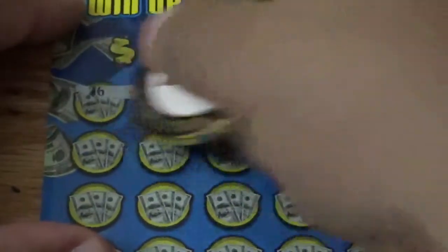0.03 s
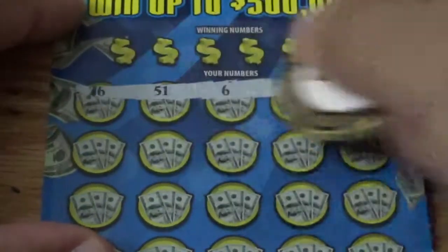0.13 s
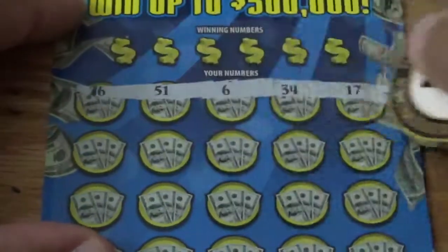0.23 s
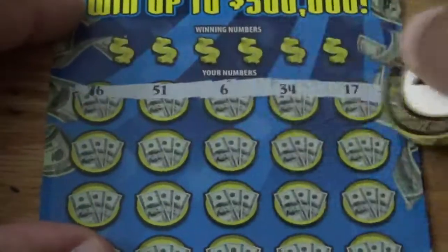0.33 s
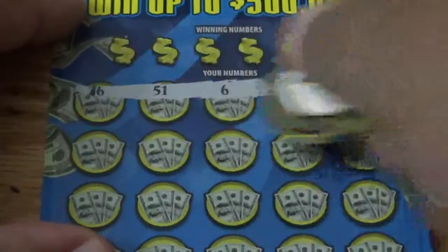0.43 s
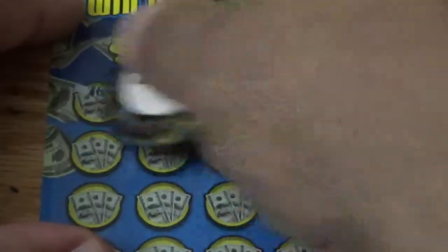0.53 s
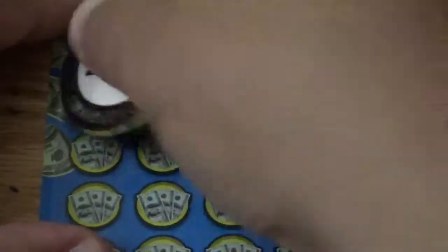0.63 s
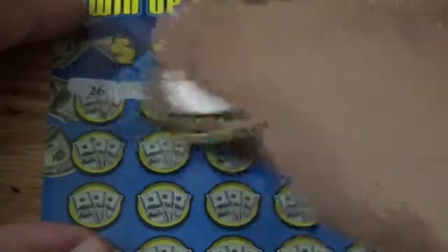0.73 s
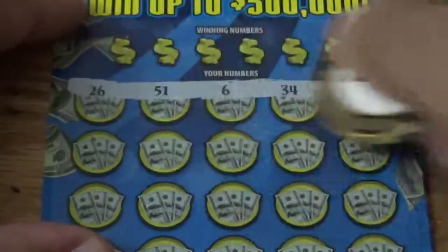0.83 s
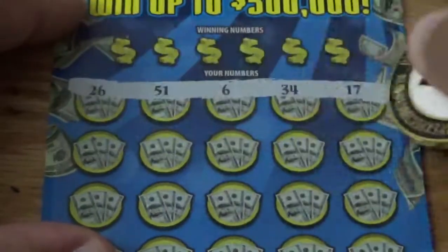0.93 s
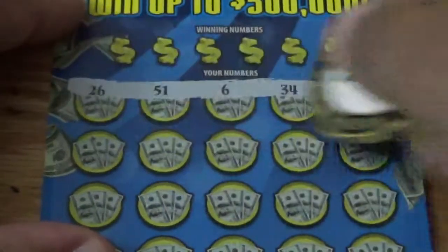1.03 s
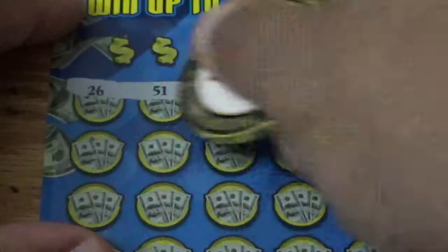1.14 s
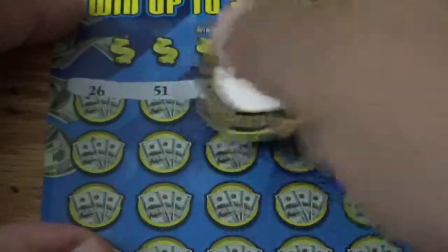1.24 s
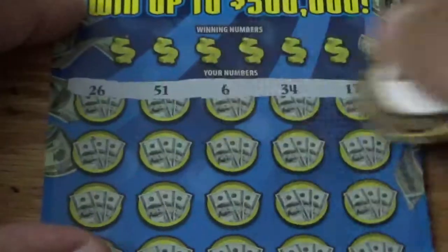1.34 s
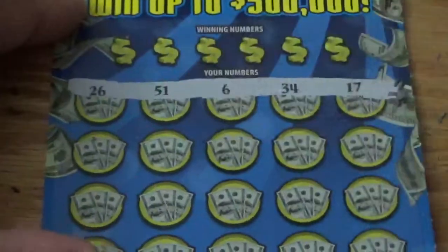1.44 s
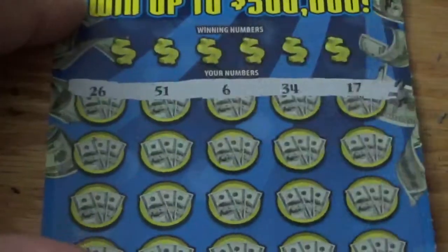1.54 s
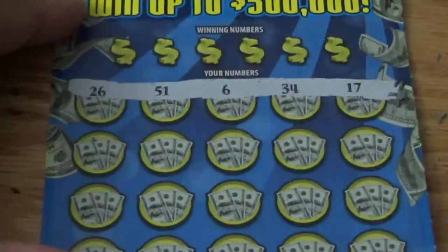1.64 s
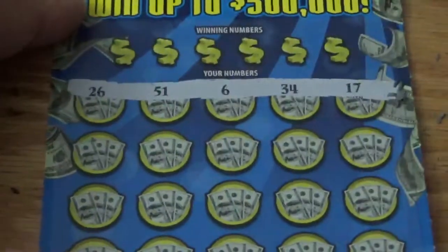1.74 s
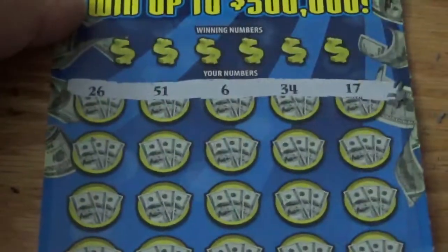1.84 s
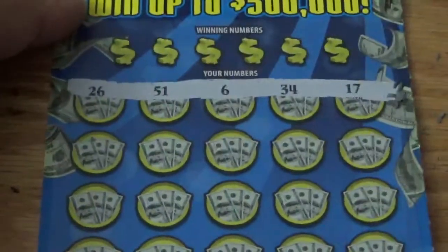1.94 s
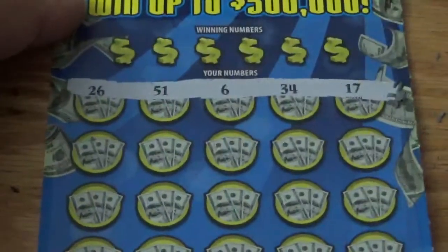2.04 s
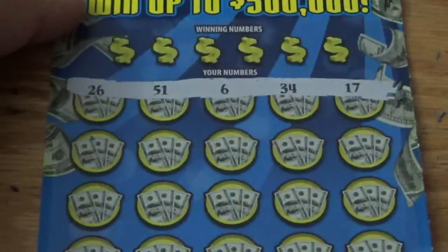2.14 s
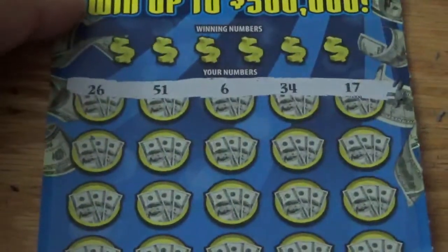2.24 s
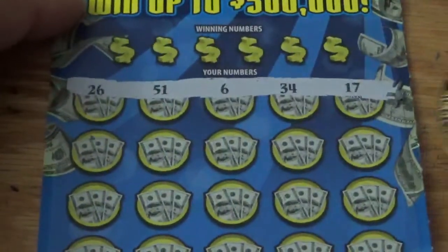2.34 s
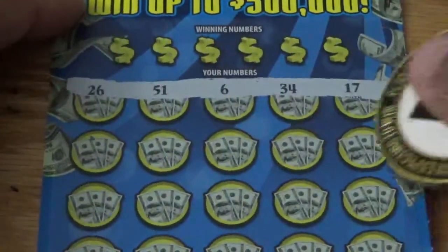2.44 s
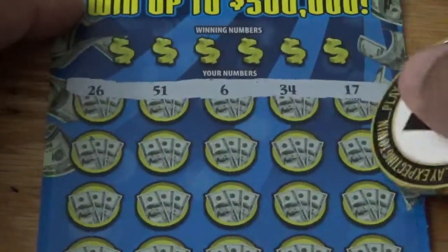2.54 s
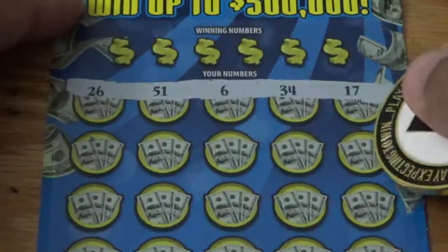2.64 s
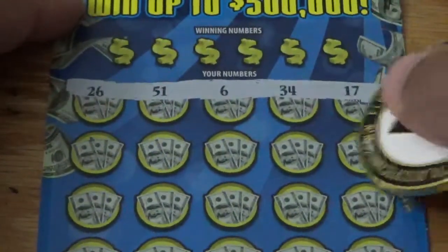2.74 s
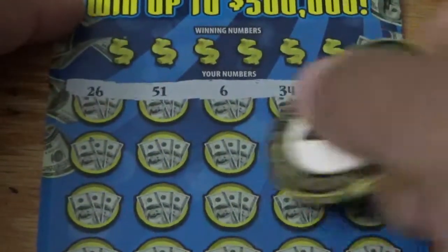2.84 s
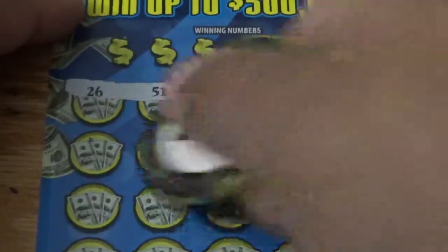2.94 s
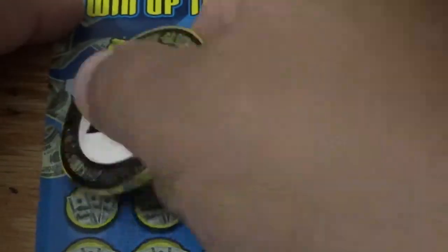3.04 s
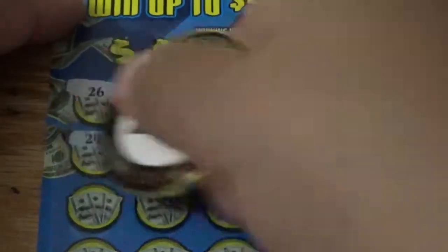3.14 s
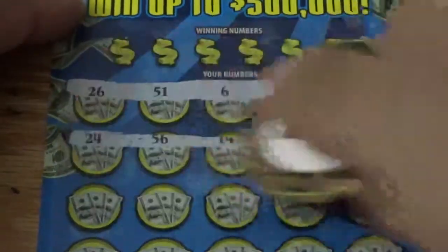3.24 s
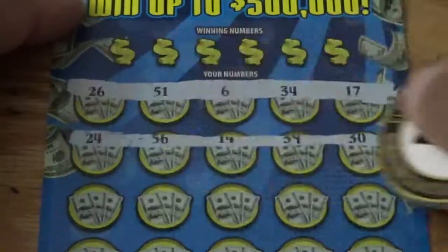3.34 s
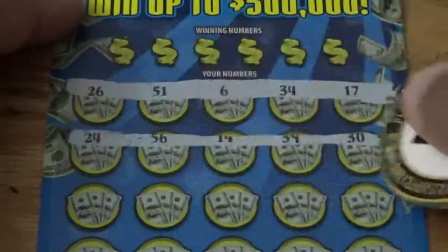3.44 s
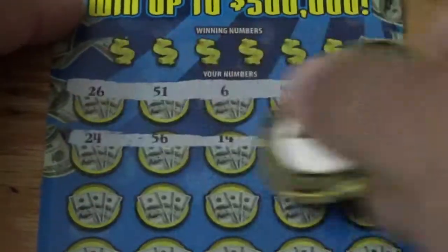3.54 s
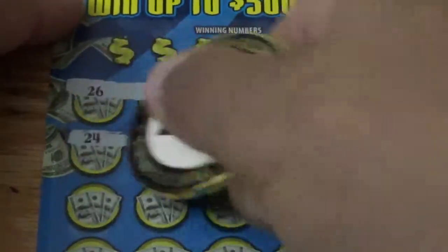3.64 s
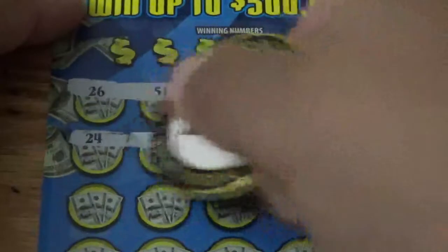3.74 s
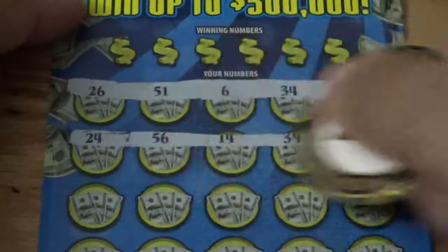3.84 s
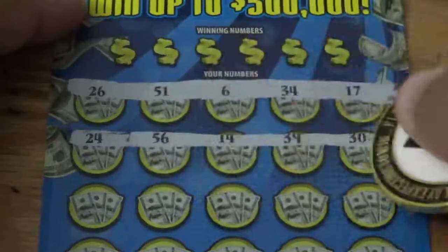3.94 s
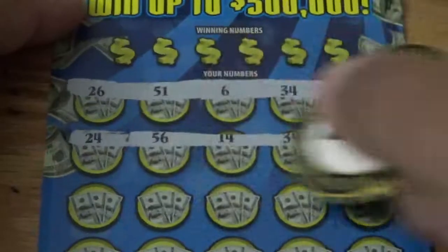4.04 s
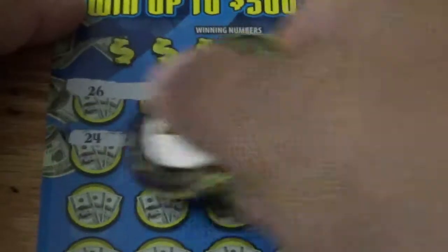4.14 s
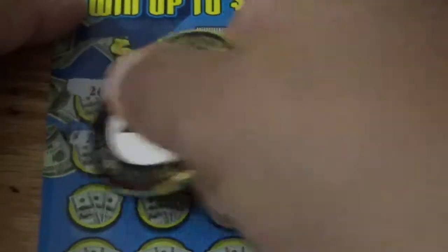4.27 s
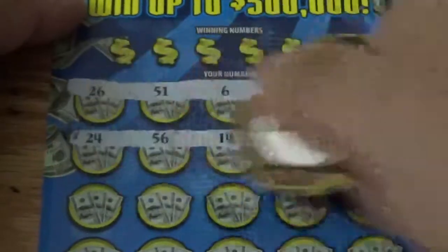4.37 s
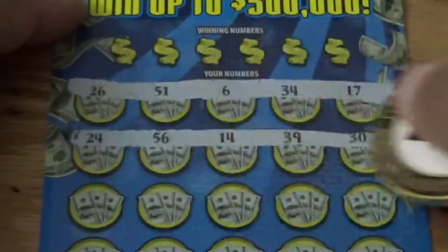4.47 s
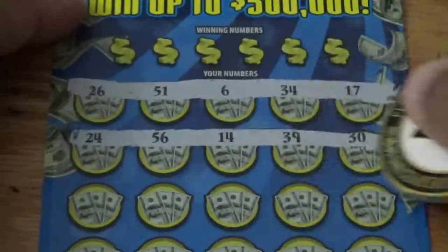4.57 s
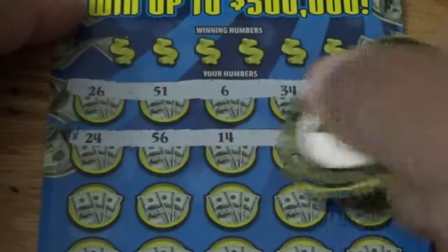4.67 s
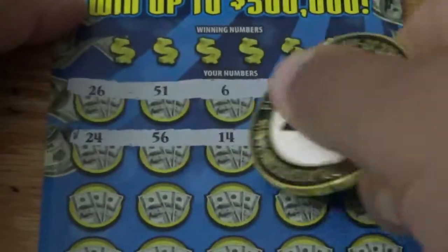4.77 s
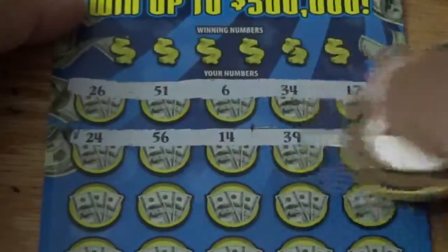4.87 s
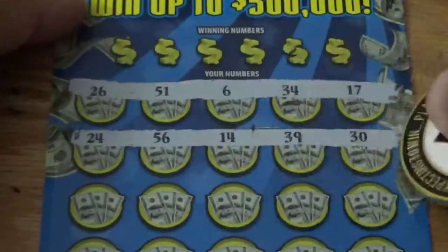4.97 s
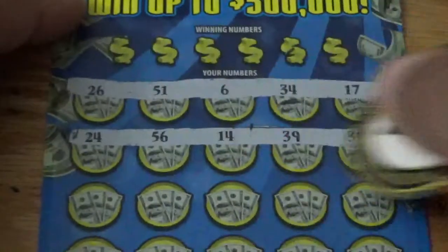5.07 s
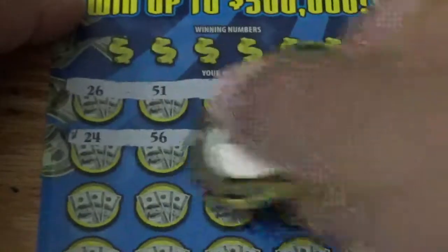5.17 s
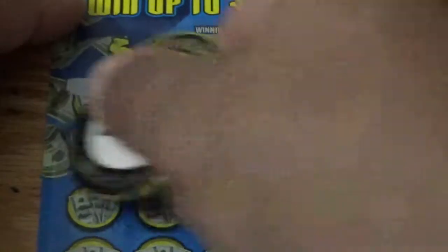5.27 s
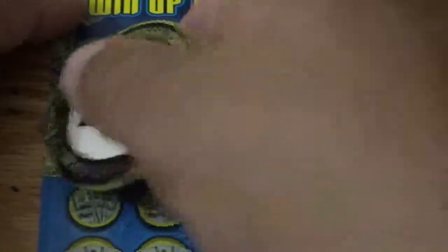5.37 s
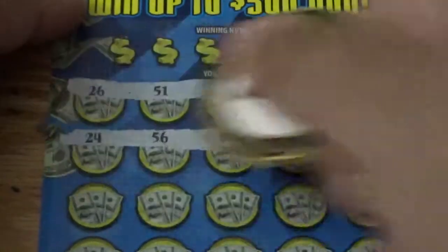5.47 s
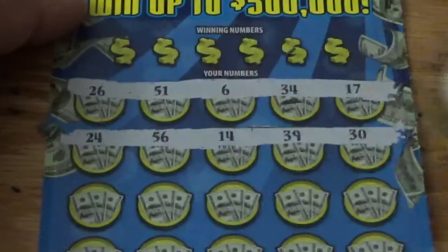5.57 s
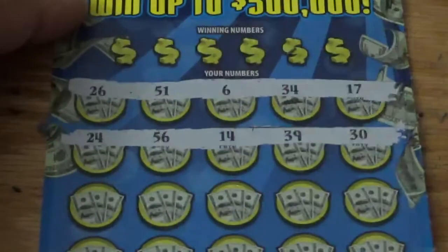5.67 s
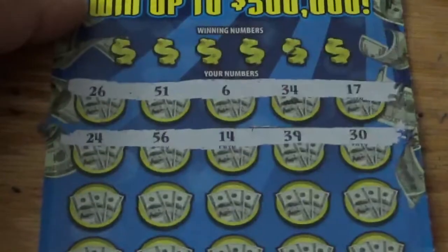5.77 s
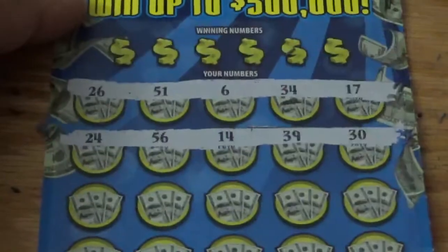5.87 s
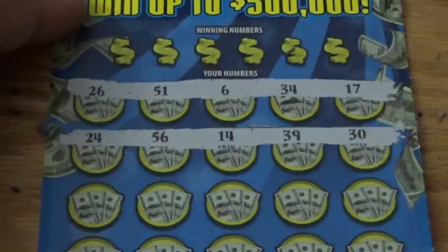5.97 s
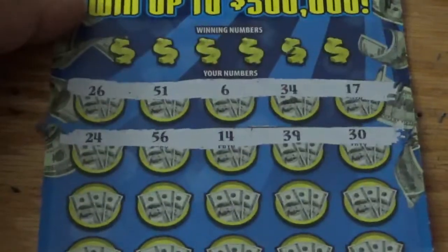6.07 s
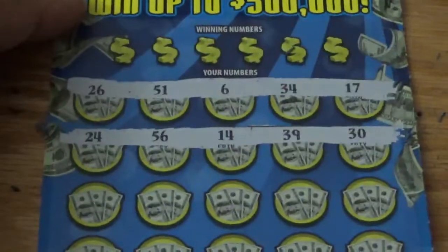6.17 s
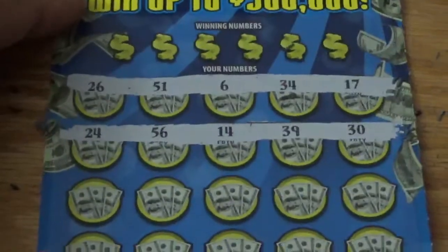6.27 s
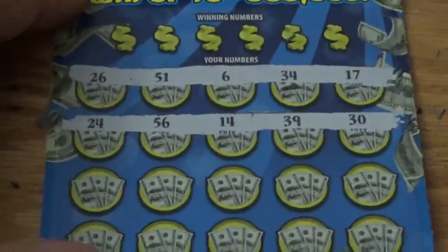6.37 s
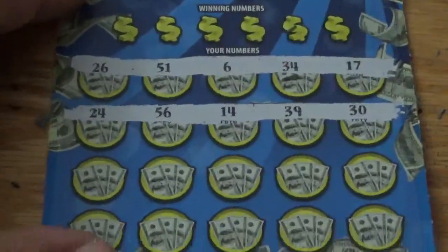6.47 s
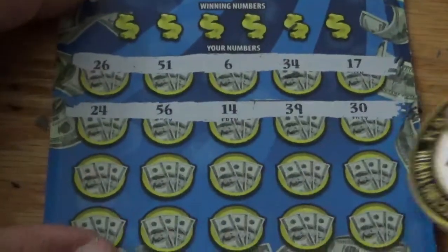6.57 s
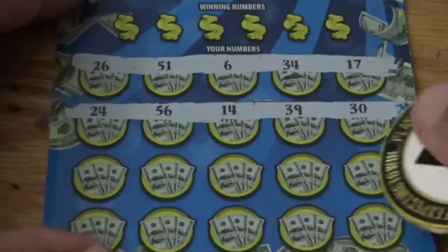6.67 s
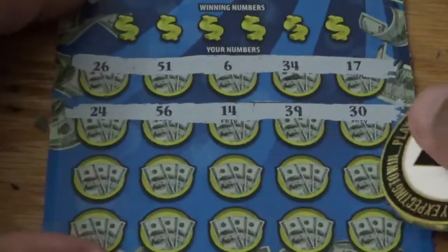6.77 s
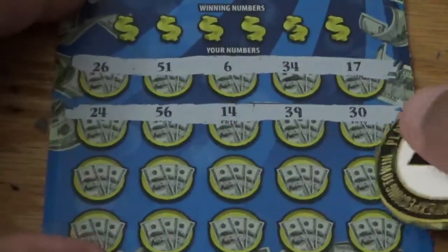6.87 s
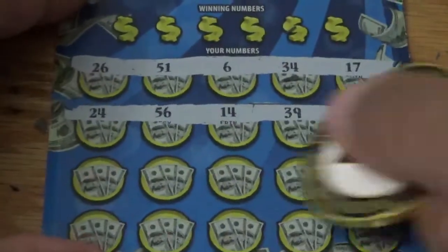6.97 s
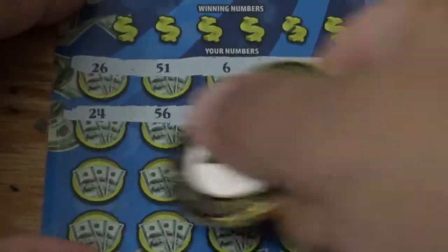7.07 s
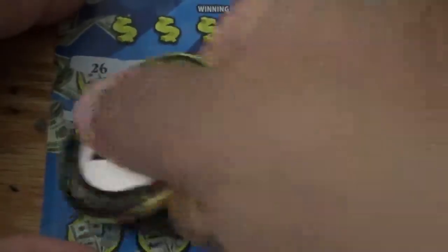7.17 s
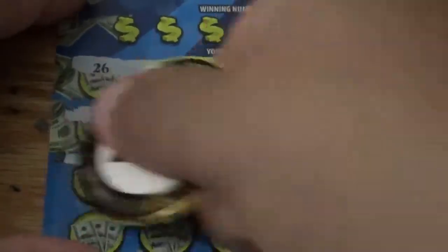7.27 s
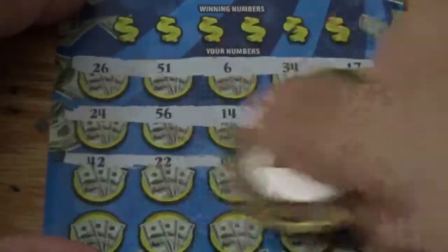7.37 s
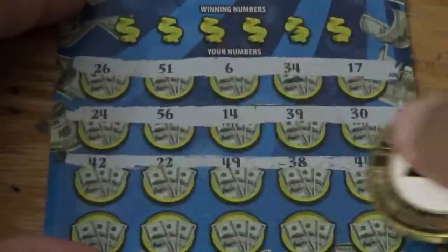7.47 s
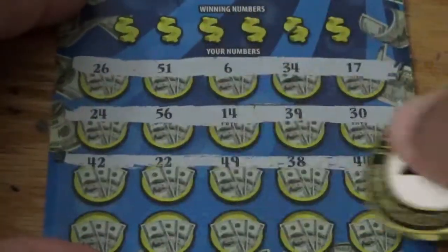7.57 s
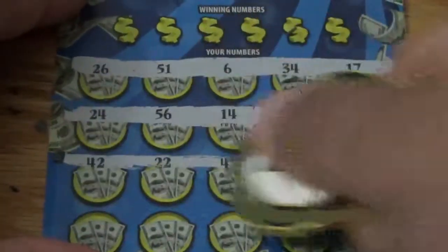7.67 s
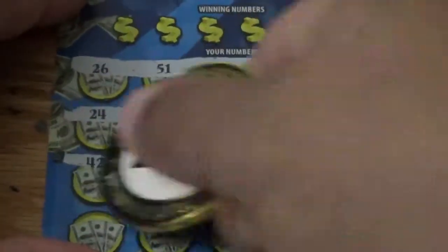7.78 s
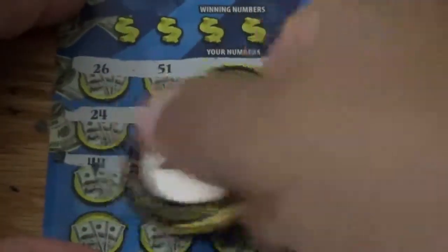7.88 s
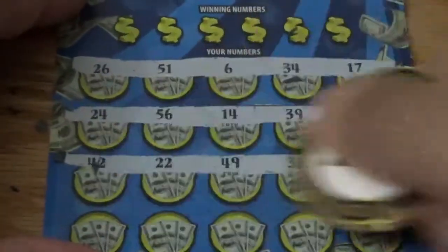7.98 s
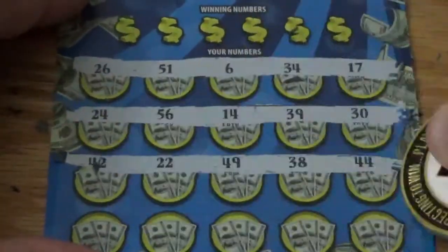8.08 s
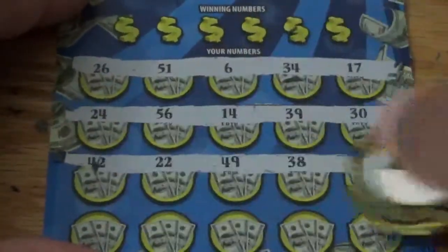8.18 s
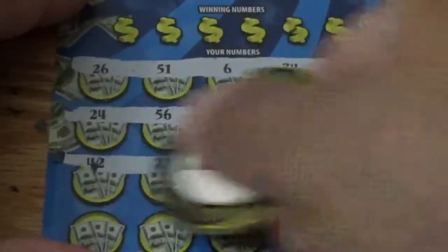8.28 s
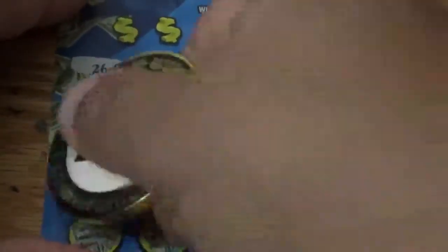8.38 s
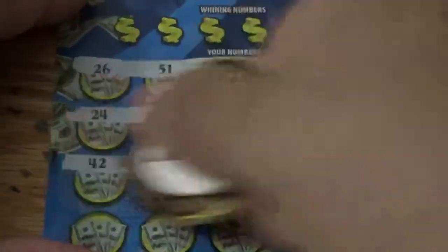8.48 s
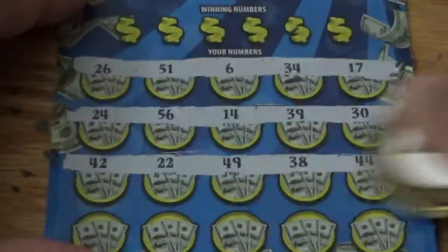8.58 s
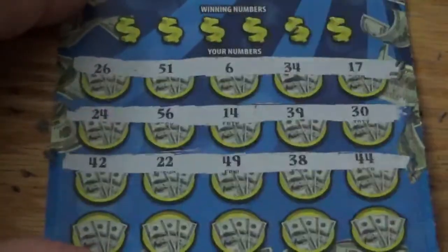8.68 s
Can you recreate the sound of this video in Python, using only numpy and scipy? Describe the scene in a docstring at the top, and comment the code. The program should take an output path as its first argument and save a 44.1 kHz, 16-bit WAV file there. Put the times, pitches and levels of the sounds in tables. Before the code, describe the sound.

A thick coin scrapes the coating off a paper ticket on a wooden table, heard close up in a quiet room. The quick back-and-forth strokes are gritty, with a hollow wooden rub underneath and a thin metallic edge. They come in three runs. In the two pauses, hand and ticket slide softly and the card gives small ticks. A few light bumps sound on the table.

```python
"""A quiet room, a stereo microphone close to a wooden table: a thick coin scrapes a paper ticket.
The coating breaks in countless tiny chips that ring the table top and the coin: strokes to the left
press deep into the wood, strokes to the right make the coin's rim sing. Between rows, hand and ticket
slide softly, the card ticks and the table takes a few bumps."""
import sys
import numpy as np
from scipy import signal
from scipy.fft import rfft, irfft, next_fast_len
from scipy.io import wavfile
from scipy.ndimage import uniform_filter1d, map_coordinates

SR = 44100
rng = np.random.default_rng(int(sys.argv[2]) if len(sys.argv) > 2 else 0)


def master_out(mix):
    """Clip the mix to full scale and print it as 16-bit PCM to the path in sys.argv[1]."""
    frames = np.transpose(np.atleast_2d(mix))
    ceiling = np.clip(frames, -1, 1)
    pcm = np.round(ceiling * 32767).astype(np.int16)
    wavfile.write(sys.argv[1], SR, pcm)


N = 384111
TIME = np.arange(N) / SR
FFT_SIZE = next_fast_len(N + SR // 2)
HZ = np.fft.rfftfreq(FFT_SIZE, 1 / SR)
DEEP_HZ, MIDDLE_HZ, TREBLE_HZ = (250, 650), (700, 2000), (2100, 11000)


def amp(db):
    """Decibels to gain."""
    return 10 ** (np.asarray(db) / 20)


def unit_rms(x):
    """x at rms 1."""
    return x / np.sqrt(np.mean(x ** 2) + 1e-20)


def curve_at(points, hz):
    """(frequency [Hz], value) points read on a log axis."""
    freqs, values = np.transpose(points)
    return np.interp(np.log(hz + 1), np.log(freqs + 1), values)


def wobble(rate):
    """A smooth random curve, rate knots a second."""
    return map_coordinates(rng.standard_normal(int(N * rate / SR) + 4), [TIME * rate])


def swells(rows):
    """Sum of bell curves from (time [s], length [s], height) rows."""
    return sum(height * np.exp(-2 * ((TIME - s) / length) ** 2) for s, length, height in rows)


def filtered(x, response):
    """x through a frequency response."""
    return irfft(rfft(x, FFT_SIZE) * response, FFT_SIZE)[..., :N]


def resonances(modes):
    """Causal response of a body whose modes alternate in sign."""
    return sum((-1) ** k * amp(db) * 1j * HZ * width / (hz * hz - HZ * HZ + 1j * HZ * width)
               for k, (hz, width, db) in enumerate(modes))


def slope(edge_hz, kind, order):
    """Causal low-pass or high-pass response."""
    return signal.freqs(*signal.butter(order, 1, kind, analog=True), HZ / edge_hz)[1]


def levelled(response, band):
    """The response scaled so that a flat force of rms 1 gives rms 1 within the band."""
    return response / np.sqrt(np.mean(abs(response) ** 2 * (HZ > band[0]) * (HZ < band[1])))


def glide(start, end, speeding, braking, jump=0, break_s=0.0038):
    """Speed (0-1) of one hand movement: it breaks free with a jump, speeds up, holds and brakes."""
    ramp = lambda t, length: np.sin(np.pi / 2 * np.clip(t / length, 0, 1))
    rise = jump * ramp(TIME - start, break_s) + (1 - jump) * ramp(TIME - start, speeding)
    return rise * ramp(end - TIME, braking)


def chipping(rate, spread_db):
    """Force of breaking coating: random impulses of unequal size, rate a second."""
    breaks = rng.random(N) < rate / SR
    return unit_rms(breaks * rng.standard_normal(N) * amp(spread_db * rng.standard_normal(N)))


def rung_by_chips(force, body, band, spread_db):
    """A body rings under a stream of chips whose strength follows the force."""
    return filtered(force * chipping(rate=13000, spread_db=spread_db), levelled(body, band))


def travelling(x, depth_db, frame):
    """As the contact point moves over the card it favours now some frequencies, now others."""
    spectra = signal.stft(x, nperseg=frame)[2]
    patch = np.outer(np.hanning(11), np.hanning(25))
    colour = signal.fftconvolve(rng.standard_normal(spectra.shape), patch, "same")
    return signal.istft(spectra * amp(depth_db * unit_rms(colour)), nperseg=frame)[1][:N]


# the empty room at the microphone: (frequency [Hz], relative density [dB])
ROOM_SPECTRUM = [(12, -69), (20, -16), (48, -7), (303, -5), (572, -12), (619, -11.5), (1640, -16),
                 (2140, -18), (2510, -18.5), (11000, -24.5), (14300, -79), (22000, -120)]
def room_tone(level_db=-56.5, side_db=-12):
    """The faint steady rumble and hiss of the room, behind everything."""
    mid, side = unit_rms(filtered(rng.standard_normal((2, N)), amp(curve_at(ROOM_SPECTRUM, HZ))))
    return amp(level_db) * np.array([mid + amp(side_db) * side, mid - amp(side_db) * side])


# the room's decay around the table: (frequency [Hz], t60 [s])
ROOM_DECAY = [(250, 0.028), (2000, 0.25), (10000, 0.11)]
def reflections(x, delay_s=.002):
    """Nearby surfaces and walls answer each side of the microphone differently."""
    hz, t, spectra = signal.stft(rng.standard_normal((2, SR // 3)), SR, nperseg=256)
    decay = amp(-60 * t / curve_at(ROOM_DECAY, hz)[:, None])
    tail = signal.istft(spectra * decay, SR, nperseg=256)[1]
    late = np.pad(x, (int(delay_s * SR), 0))
    return signal.fftconvolve(late[None], tail / np.linalg.norm(tail[0]), axes=1)[:, :N]


# sliding paper heard close: (frequency [Hz], relative density [dB])
PAPER_SPECTRUM = [(880, -31), (1500, -11), (1830, -10.5), (3280, -13.5), (6400, -2), (9230, 0.5),
                  (11000, -11.5), (14300, -44), (22000, -120)]
# hand and ticket cross the table: (start [s], end [s], speeding up [s], braking [s], level [dB])
HAND_SLIDES = [(1.355, 1.768, 0.045, 0.29, -46), (2.15, 2.543, 0.088, 0.19, -53.5),
               (5.38, 5.867, 0.069, 0.31, -41), (6.15, 6.766, .28, 0.31, -54.5),
               (8.57, 8.95, 0.043, 0.34, -38.5)]
def slides(speed_power=2.26):
    """Smooth card and skin gliding on wood: a fine, high hiss that grows with speed."""
    hiss = unit_rms(filtered(chipping(rate=27000, spread_db=0.5), amp(curve_at(PAPER_SPECTRUM, HZ))))
    level = sum(amp(db) * glide(*timing) ** speed_power for *timing, db in HAND_SLIDES)
    return travelling(hiss, depth_db=3.1, frame=256) * level * amp(0.61 * wobble(38))


# card and coin edge tick near the microphone: (time [s], relative level [dB], pitch [Hz])
CARD_TICKS = [(0.3147, -18.5, 5500), (0.9654, -28, 4530), (0.9872, -29, 2890), (2.141, -36, 9880),
              (2.177, -30, 7940), (2.5176, -36, 6710), (2.5826, -13, 7600), (2.681, -33, 6330),
              (6.2296, -36, 6560), (6.764, -20, 7060), (7.5244, -30, 5720), (8.5907, -5.5, 7900)]
def ticks(snap_t60=0.001, rustle_t60=0.02, rustle_db=-21):
    """Each tick is a snap of a few cycles and a short rustle of the card."""
    out, t = np.zeros(N + SR), np.arange(SR // 10) / SR
    for s, db, hz in CARD_TICKS:
        snap = np.sin(2 * np.pi * hz * t) * amp(-60 * t / snap_t60) * (1 - np.exp(-t / .0001))
        rustle = rng.standard_normal(len(t)) * amp(rustle_db - 60 * t / rustle_t60)
        out[round(s * SR):][:len(t)] += amp(db + 7.0) * (snap + rustle)
    return filtered(out[:N], slope(2400, "high", order=2))


# coin or hand bumps the table: (time [s], relative level [dB], centre of the blow [Hz])
TABLE_KNOCKS = [(0.315, -25.5, 308), (2.41, -46, 315), (5.053, -21.5, 348), (6.343, -39, 310),
                (6.811, -23.5, 315), (6.849, -34.5, 308), (7.226, -16, 1380), (8.211, -11, 900)]
def knocks(breadth=0.22):
    """A bump rings the table top; the softer the blow, the lower the modes it reaches."""
    out, wood = np.zeros(N + SR), resonances(WOOD_MODES)
    for s, db, hz in TABLE_KNOCKS:
        blow = resonances([(hz, breadth * hz, 0)]) * slope(3 * hz, "low", order=2)
        ring = irfft(wood * blow, FFT_SIZE)[:SR // 2]
        out[round(s * SR):][:len(ring)] += amp(db - 3.5) * ring / abs(ring).max()
    return out[:N]


# the table top under the microphone: (frequency [Hz], width [Hz], level [dB])
WOOD_MODES = [(208, 26.5, -20), (309, 18.4, -2), (351.3, 45, -6), (422, 13, -3.5), (497.4, 68, -5.5),
              (496.5, 13.8, 2.5), (584.4, 14.9, -1), (643.7, 21.5, 0.6), (700, 56, -12.5), (734.3, 27, 6.0),
              (767.4, 120, 0), (895.6, 30, 4.5), (939, 30, 3.5), (1028, 23.6, 1.5), (1092, 39, -0.2),
              (1153, 41, 2), (1229.5, 19.5, 2.5), (1285, 18, 1), (1354, 154, -8.5), (1537, 32, 0),
              (1625, 34.4, -2.5), (1777, 18.5, -5), (1892, 105, -9.5)]
def table_top(force, weight, pressure, bass_db=-11):
    """Chips ring the wood: a heavy hand reaches its low modes, a light one its high modes."""
    wood = resonances(WOOD_MODES) * slope(161, "high", order=2) * slope(1990, "low", order=6)
    softness = pressure ** 0.75
    upper = force / np.hypot(1, softness)
    zones = [(force * amp(bass_db) * pressure ** 1.03, slope(385, "low", order=7), DEEP_HZ),
             (force * weight * 0.81, slope(380, "high", order=6) * slope(638, "low", order=7), DEEP_HZ),
             (upper * softness, slope(657, "high", order=6) * slope(1006, "low", order=8), MIDDLE_HZ),
             (upper, slope(1050, "high", order=8), MIDDLE_HZ)]
    return sum(rung_by_chips(level, wood * zone, band, spread_db=1.5) for level, zone, band in zones)


# the coin on the card, damped by the fingers: (frequency [Hz], width [Hz], level [dB])
COIN_MODES = [(2189, 60.4, 7.5), (2620, 145, -2), (3000, 420, -4), (3710, 185, -6.5), (4050, 190, -4),
              (4680, 290, -9), (4960, 170, -8), (5700, 226, -3.5), (6630, 770, -12), (7460, 730, -7.5),
              (8430, 570, -8.5), (8940, 870, -8.5), (10780, 390, -17.5)]
RIM_MODE, PARTNER_MODE, OVERTONE_MODE = (5850, 95, 0), (6370, 510, 0), (8360, 280, 0)  # the strongest
# the fingers free the rim's partner mode more or less: (time [s], level against the rim [dB])
FINGER_HOLD = [(.8, -2.5), (3.3, -14), (4.4, -6.5), (7.4, -5)]
def coin(force, speed, pressure, rim_gain, overtone_gain):
    """The coin's body rasps and its rim sings in bursts, more when held lightly and so less damped."""
    sing = rim_gain * pressure ** -.3
    partner = sing * amp(np.interp(TIME, *np.transpose(FINGER_HOLD)))
    zing = overtone_gain * speed ** 4
    grit = force / np.sqrt(1 + sing ** 2 + partner ** 2 + zing ** 2)  # the modes share the energy
    bursts = unit_rms(amp(1.64 * wobble(170)))
    rim = sum(rung_by_chips(grit * bursts * share, resonances([mode]), TREBLE_HZ, spread_db=4.5)
              for share, mode in [(sing, RIM_MODE), (partner, PARTNER_MODE), (zing, OVERTONE_MODE)])
    metal = resonances(COIN_MODES) * slope(1800, "high", order=4)
    return rung_by_chips(grit, metal, TREBLE_HZ, spread_db=2.5), rim


# the coin's edge digs in and skids: (time [s], length [s], level [dB])
EDGE_CATCHES = [(0.145, 0.035, -25), (0.778, 0.015, -29.5), (0.879, 0.027, -30.5), (1.338, 0.026, -27),
                (3.356, 0.021, -28.5), (3.43, 0.02, -47.5), (4.512, 0.02, -32.5), (4.567, 0.009, -43.5),
                (5.057, 0.0077, -28.5), (5.076, 0.0066, -28.5), (5.313, 0.024, -36), (8.077, 0.012, -24.5),
                (8.163, 0.022, -38.5), (8.521, 0.021, -23.5), (8.573, 0.022, -32.5)]
def catches(wood_db=-7, rim_db=-5):
    """A skid of the edge tears off a clump of coarse chips."""
    clumps = swells((s, length, amp(db)) for s, length, db in EDGE_CATCHES)
    body = levelled(resonances(COIN_MODES) * slope(5400, "high", order=2), TREBLE_HZ)
    rim = levelled(resonances([RIM_MODE]), TREBLE_HZ)
    metal = levelled(body - amp(rim_db) * rim, TREBLE_HZ)
    wood = levelled(resonances(WOOD_MODES) * slope(740, "high", order=3), MIDDLE_HZ)
    return filtered(clumps * chipping(rate=8400, spread_db=1.0), metal + amp(wood_db) * wood)


CREEP = 0.19  # share of full speed while the coin turns
# coin strokes across the ticket; the faint rub at 6.22 s is the ticket being pushed along the table:
# (start [s], end [s], speeding up [s], braking [s], table top [dB], rasp [dB],
# weight of deep wood against table top [dB], rim [dB], overtone [dB])
HAND_STROKES = [ (0.019, 0.301, 0.15, 0.098, -26.5, -26, -12.5, -3.5, -4.5),
                (0.345, 0.646, 0.086, 0.073, -27.5, -33, -4.5, -8, -23),
                (0.675, 0.978, 0.063, 0.16, -30, -29, -12, -2, -15),
                (0.988, 1.204, 0.14, 0.14, -25, -30, -4, -7.5, -18),
                (1.221, 1.376, 0.043, 0.084, -31.5, -32, -5.5, 2, -4.5),
                (2.726, 3.102, 0.17, 0.15, -34.5, -32.5, -5.5, -4.5, -4),
                (3.108, 3.408, 0.085, 0.062, -31, -27.5, -15, 1, -11),
                (3.453, 3.712, 0.067, 0.13, -32, -34, -5.5, -7, -8.5),
                (3.726, 3.942, 0.1, 0.1, -29.5, -29.5, -12.5, -1.5, -14),
                (3.983, 4.26, 0.14, 0.17, -29.5, -32, -6.5, -3.5, -4),
                (4.285, 4.528, 0.18, 0.13, -26.5, -24, -13, -1.5, 1),
                (4.579, 4.77, 0.12, 0.13, -30.5, -31.5, -4, -7, -12),
                (4.8, 4.989, 0.09, 0.056, -33, -34, -7, -3, -19),
                (5.044, 5.369, 0.063, 0.13, -32.5, -30, -2.5, -5, -3.5),
                (6.224, 6.37, 0.02, 0.1, -60, -72, -6, -15, -15),
                (6.912, 7.263, 0.12, 0.14, -32, -30.5, -12, -5, -6),
                (7.277, 7.57, 0.11, 0.1, -28, -25, -20, -1.5, -14),
                (7.586, 7.858, 0.078, 0.12, -31, -29, -11.5, -4.5, -6.5),
                (7.861, 8.134, 0.076, 0.098, -31, -29, -14.5, -0.5, -7),
                (8.131, 8.416, 0.14, 0.08, -30.5, -32, -7.5, -6, -9),
                (8.452, 8.611, 0.13, 0.13, -29.5, -29.5, -7.5, -9, -11), ]
def hand(breakaway=0.3, turn_s=0.061):
    """The hand's speed (0-1) and the five gains of the stroke under way."""
    speed, current = np.zeros(N), np.zeros(N, int)
    for k, (start, end, speeding, braking, *_) in enumerate(HAND_STROKES):
        creep = CREEP * np.clip(1 + np.minimum(TIME - start, end - TIME) / turn_s, 0, 1)
        stroke_speed = np.maximum(glide(start, end, speeding, braking, breakaway), creep)
        current[stroke_speed > speed] = k
        speed = np.maximum(speed, stroke_speed)
    gains = amp([stroke[4:] for stroke in HAND_STROKES])
    return speed, uniform_filter1d(gains[current].T, size=256, axis=1)


# the hand bears down or eases off: (time [s], length [s], change in the table top [dB])
HAND_PRESSES = [(0.55, 0.042, 4), (0.73, 0.058, 2.5), (1.335, 0.03, 2.5), (4.16, 0.032, 4.5),
                (4.71, 0.046, 2.5), (5.135, 0.053, 5), (5.225, 0.05, -1.5), (7.48, 0.052, 0.5)]
# the edge runs smoothly for a moment: (time [s], length [s], dip in the rasp [dB])
RASP_DIPS = [(0.833, 0.042, -11.0), (4.493, 0.026, -11), (5.1, 0.039, -9), (5.274, 0.064, -10),
             (8.205, 0.027, -12.5)]
def scrape(deep_power=0.79, top_power=1.28, rasp_power=1.91, judder_db=1.23):
    """Close up, strokes ring wood and coin; each grows as a power of speed, the rasp most steeply."""
    speed, (top, rasp, weight, rim_gain, overtone_gain) = hand()
    press = amp(swells(HAND_PRESSES))
    top = top * press * speed ** top_power
    rasp = rasp * speed ** rasp_power * amp(swells(RASP_DIPS))
    weight = weight * press ** .35 * np.maximum(speed, CREEP) ** (deep_power - top_power)
    pressure = np.clip(weight / amp(-6.5), .2, 3)  # 1 for an ordinary stroke
    grip = unit_rms(amp(judder_db * wobble(130) + 0.54 * wobble(35)))  # the edge catches and lets go
    wood = table_top(top * grip, weight, pressure)
    body, rim = coin(rasp * grip, speed, pressure, rim_gain, overtone_gain)
    return travelling(wood, depth_db=1.46, frame=1024) + travelling(body, depth_db=2.5, frame=512) + rim


def scene():
    """Strokes, slides and small contacts close to the microphone, nearly centred, the room behind."""
    rubbing = scrape() + catches() + slides()
    contacts = ticks() + knocks()
    wet = reflections(amp(-11.0) * rubbing + amp(-12.5) * contacts)
    balance = amp([[.15], [-.5]])  # left, right
    return (rubbing + contacts) * balance + wet + room_tone()


def record(dry, top_hz=11080):
    """The recorder keeps nothing above its band limit."""
    return filtered(dry, 1 / (1 + (HZ / top_hz) ** 160))


dry = scene()
out = record(dry)
master_out(out)
```